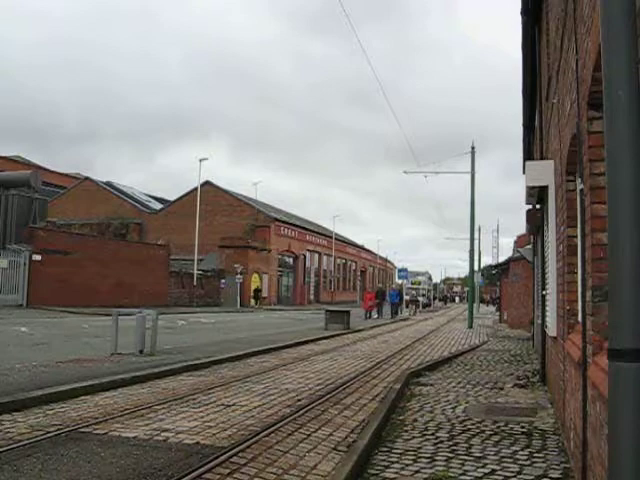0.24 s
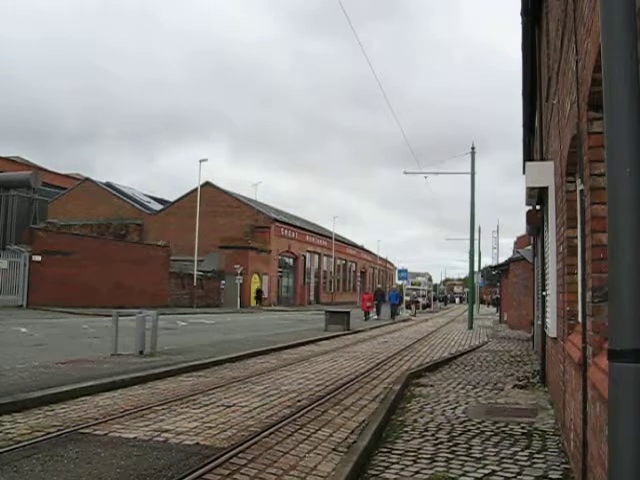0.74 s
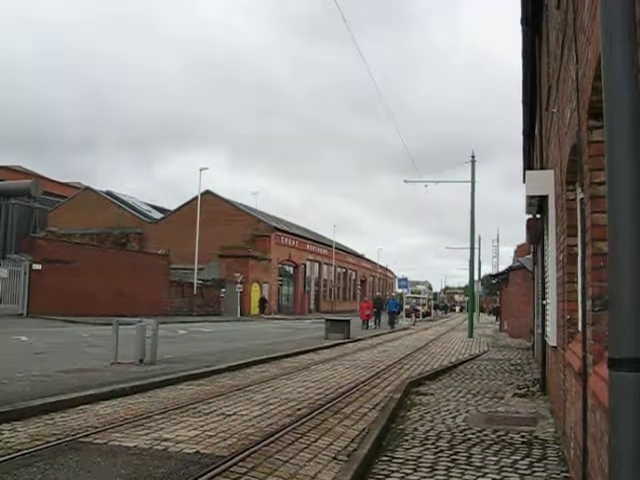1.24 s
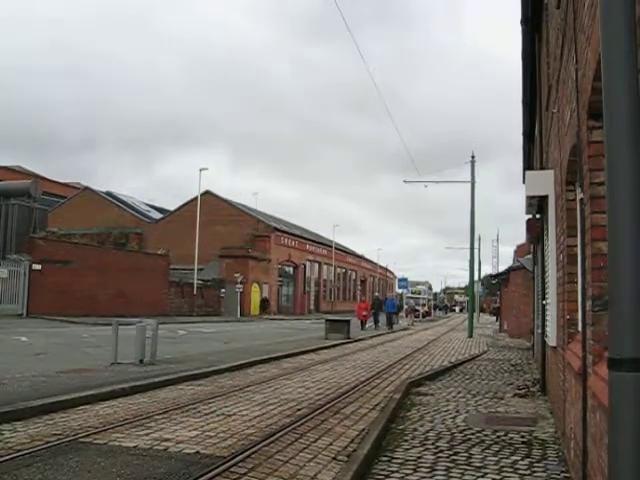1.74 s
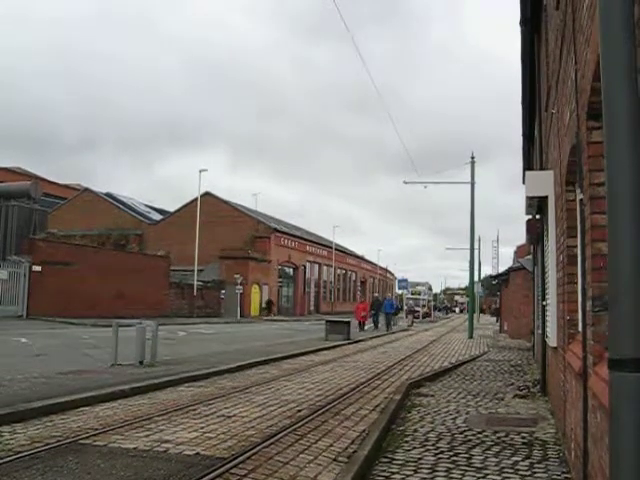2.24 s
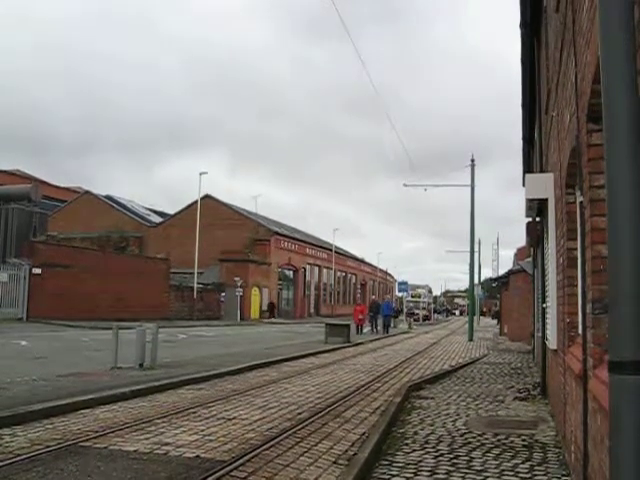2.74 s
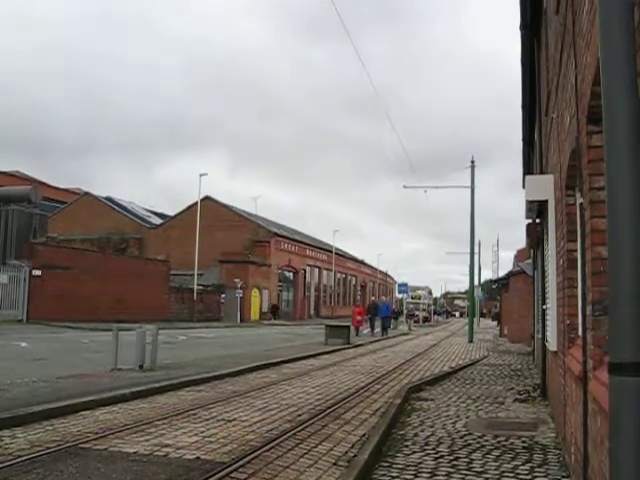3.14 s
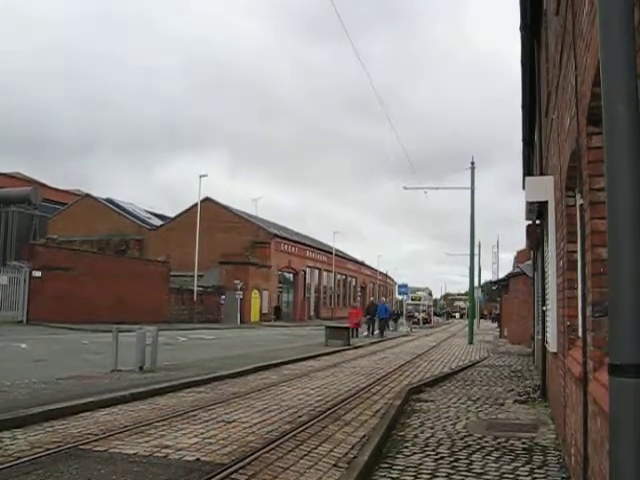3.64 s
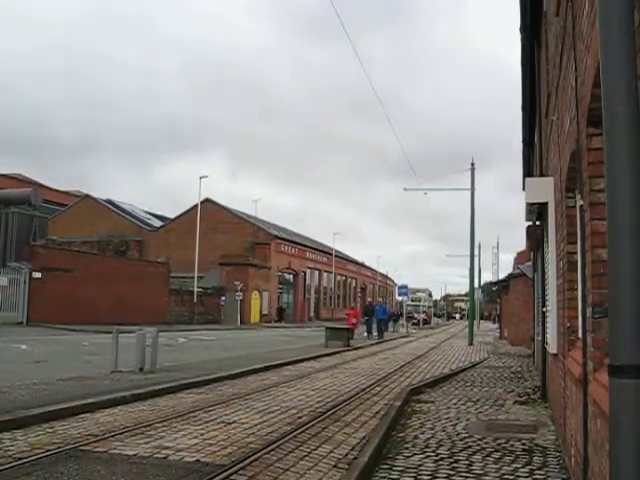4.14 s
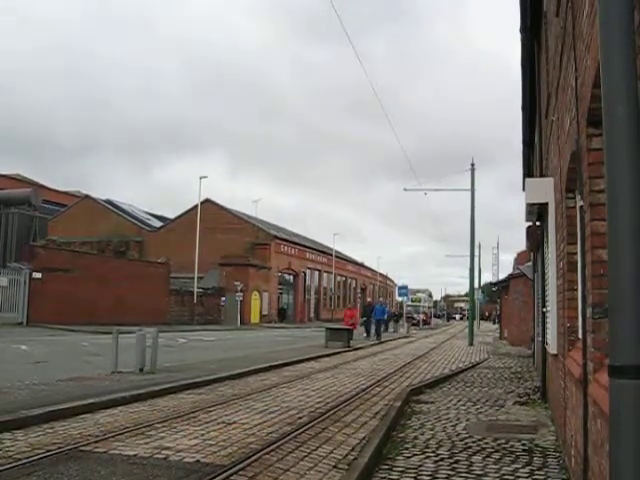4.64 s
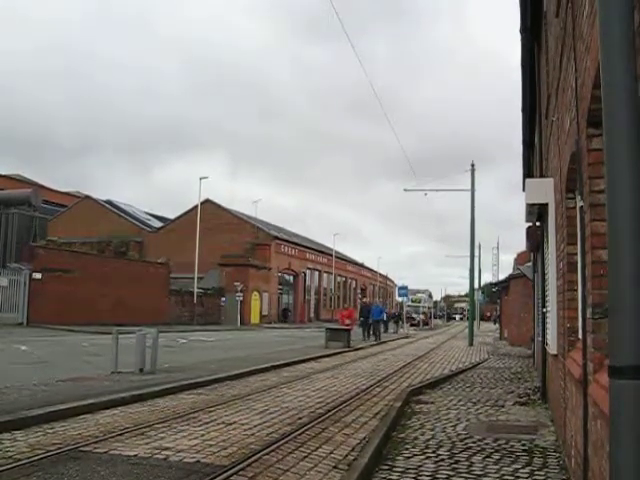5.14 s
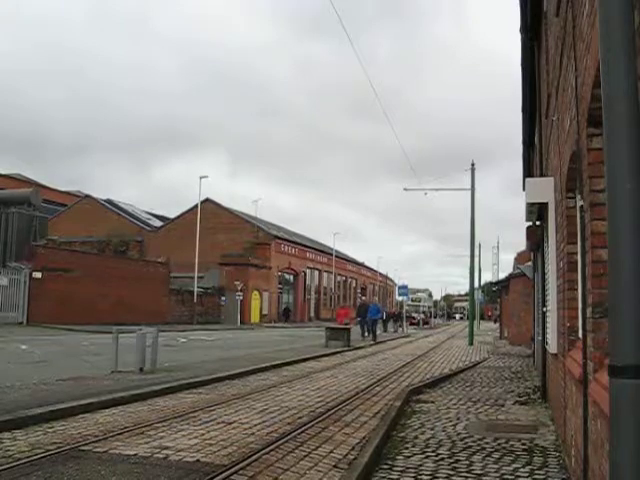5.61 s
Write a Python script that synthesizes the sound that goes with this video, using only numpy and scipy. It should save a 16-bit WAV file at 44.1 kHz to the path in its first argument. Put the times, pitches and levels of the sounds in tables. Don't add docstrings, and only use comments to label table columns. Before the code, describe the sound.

A deep mains-type hum with fainter higher overtones drones beneath dull distant traffic. Close wind bursts thump, flutter and spit against the microphone, each making the background dip and creep back. A ringing tap comes at about one second, more knocks and light scrapes after four. The later part is calmer and hummier, with a small click and faint thin tones at the end. Narrow, muffled, mono sound.

```python
import sys
import numpy as np
from scipy import signal
from scipy.fft import rfft, irfft, next_fast_len
from scipy.io import wavfile
from scipy.ndimage import uniform_filter1d, map_coordinates

SR = 44100
rng = np.random.default_rng(int(sys.argv[2]) if len(sys.argv) > 2 else 0)


def master_out(mix):
    frames = np.transpose(np.atleast_2d(mix))
    ceiling = np.clip(frames, -1, 1)
    pcm = np.round(ceiling * 32767).astype(np.int16)
    wavfile.write(sys.argv[1], SR, pcm)


def linear_from_db(decibels):
    return 10 ** (np.asarray(decibels, float) / 20)


N = 258867
TIME = np.arange(N) / SR
SKIP_S, LOST_S = 5.39613, 0.00213


def unit(x):
    return x / np.sqrt(np.mean(x ** 2) + 1e-20)


def along(points, hz):
    f, v = np.transpose(points)
    return np.interp(np.log(hz + 1), np.log(f + 1), v, left=-120, right=-120)


def shaped(x, spectrum):
    gain_db = along(spectrum, np.fft.rfftfreq(len(x), 1 / SR))
    return irfft(rfft(x) * linear_from_db(gain_db), len(x))


def wobble(knots_per_s):
    knots = rng.standard_normal(int(N * knots_per_s / SR) + 4)
    return map_coordinates(knots, [TIME * knots_per_s])


def noise(spectrum):
    white = rng.standard_normal(next_fast_len(N + 8192))
    return unit(shaped(white, spectrum)[:N])


def coloured(burst, spectrum):
    x = shaped(burst, spectrum)
    return x / np.linalg.norm(x)


def buffeting():
    # peak_s, length_s, strength_db, eddy_size_db (plus = large and low)
    gusts = [(0.183, 0.077, -25.5, -2.5), (0.303, 0.15, -29, 1), (0.445, 0.035, -35, 8),
             (0.766, 0.17, -27.5, 3), (0.946, 0.3, -30, 0.5), (1.062, 0.073, -22.5, 1.5),
             (1.141, 0.034, -26.5, 4), (1.25, 0.1, -24.5, 0.5), (1.42, 0.21, -28.5, 0.5),
             (1.621, 0.028, -24, -1.5), (1.737, 0.076, -24.5, 2), (1.933, 0.18, -32, -4),
             (2.035, 0.078, -25, 4), (2.26, 0.19, -35.5, -6.5), (2.49, 0.13, -29, 2),
             (2.742, 0.035, -24.5, 0.5), (2.965, 0.037, -30, -1), (3.103, 0.08, -32.5, 5.5),
             (3.301, 0.14, -29, 1), (3.493, 0.076, -21, -2), (3.624, 0.12, -25.5, -2.5),
             (3.733, 0.093, -26.5, -2), (3.84, 0.055, -31, 1), (4.022, 0.038, -44, 15),
             (4.187, 0.12, -24.5, 2), (4.398, 0.17, -25, -1.5), (4.631, 0.31, -26.5, -0.5),
             (5.12, 0.13, -24.5, 3.5), (5.43, 0.28, -31.5, -2), (5.636, 0.37, -34, 2)]
    # freq_hz, level_db_per_hz
    rumble = [(15, -30.5), (30, -8.5), (60, -6), (90, -4.5), (130, -25)]
    # freq_hz, level_db_per_hz
    flutter = [(70, -34), (100, -2.5), (170, -3), (230, -10.5), (300, -37)]
    # freq_hz, level_db_per_hz
    body = [(170, -31.5), (240, -2.5), (450, -7.5), (800, -18.5), (1300, -25.5), (2500, -43), (5000, -61)]
    breeze_db, body_calm_db = -36, -35
    mid_gust_db, body_db, body_follows = -28, -29, 0.38
    still_s, still_db = 0.13, -15
    fall_ratio = 0.77

    lumps = wobble(28)
    coarse_s = TIME[::64]
    peak_s, length_s, db, size_db = np.transpose(gusts)
    since_s = coarse_s[:, None] - peak_s
    width_s = length_s * np.where(since_s > 0, fall_ratio, 1)
    swell = np.exp(-(2 * since_s / width_s) ** 2)
    calming_db = still_db * np.clip(1 - coarse_s / still_s, 0, 1) ** .5

    def layer(colour, peak_db, calm_db, trim_db, lumpy_db):
        power = swell @ linear_from_db(2 * peak_db) + linear_from_db(2 * (calm_db + calming_db))
        gain = np.repeat(np.sqrt(power), 64)[:N]
        return gain * linear_from_db(trim_db) * unit(linear_from_db(lumpy_db * lumps) * noise(colour))

    small_db = body_db + body_follows * (db - mid_gust_db)
    return (layer(rumble, db + size_db, breeze_db, .3, 1.5)
            + layer(flutter, db - size_db, breeze_db, .3, 3)
            + layer(body, small_db, body_calm_db, -2.5, 3.5))


def eddies():
    # time_s, level_db, bite_db, length_ms
    strong = [(.1684, -17.5, -48, 1.64), (.187, -22, -40, 1.6), (.2084, -22, -38, 4),
              (.2158, -24.5, -41, 3.9), (.2228, -27.5, -15, 3.9), (.2248, -21, -36, 5.3),
              (.3393, -22, -51, 4.3), (.3688, -24, -32, 3.8), (.3829, -25, -23, 2.5),
              (.8393, -27.5, 5, 1.2), (.8752, -28.5, 1, 3.5), (.8822, -29.5, -10, 6.7),
              (1.1407, -31, -17, 25), (1.1593, -29.5, 2, 3.6), (1.2415, -27, -22, 5.4),
              (1.2579, -21.5, -30, 5.8), (1.2719, -21, -18, 5.6), (1.288, -27, -14, 6.3),
              (1.297, -29.5, -14, 9.8), (1.3808, -24, -17, 7.4), (1.6157, -27, -20, 5),
              (1.7912, -27, -5, 3.4), (2.035, -23, -17, 5.6), (2.039, -26, -22, 3.4),
              (2.0569, -21, -25, 4.2), (2.1832, -27.5, -12, 5.6), (2.2149, -27, -19, 9.5),
              (2.2639, -23.5, -16, 2.6), (2.2699, -24, -9, 4.5), (2.4706, -26.5, -29, 2.9)]
    # time_s, level_db, bite_db
    lesser = [(.1528, -33, -11), (0.2014, -29.5, -29), (0.3293, -38, -29), (0.4182, -29.5, -28),
              (.4448, -32.5, -29), (.6194, -42.5, -19), (.7893, -34, -15), (1.0998, -32, -13),
              (1.2319, -30, -9), (1.281, -29, -11), (1.3575, -32.5, -7), (1.3931, -27.5, -19),
              (1.448, -36.5, -5), (1.4841, -34, -25), (1.5527, -38, -11), (1.7673, -31, -19),
              (1.779, -28.5, -15), (1.7981, -30.5, -14), (1.963, -33.5, -8), (2.064, -24.5, -31),
              (2.0928, -32.5, -14), (2.1166, -31, -17), (2.1768, -26, -29), (2.2432, -33, -13),
              (2.2926, -36, -16), (2.5095, -31, -26), (3.3036, -38, -24), (3.5098, -32, -23),
              (5.1598, -39, -20), (5.4502, -33, -33)]
    # first_s, eddy_count, level_db
    flurries = [(0.179, 2, -32), (0.2983, 1, -32.5), (0.348, 2, -44), (.395, 2, -42), (0.6818, 4, -46),
                (.858, 1, -35), (1.0887, 1, -38), (1.2099, 2, -37), (1.3085, 4, -36), (1.4251, 3, -34),
                (1.5219, 1, -42), (1.595, 1, -37), (1.6306, 2, -32), (1.7231, 4, -34.5), (1.808, 1, -35),
                (1.8509, 3, -36), (1.9308, 6, -39.5), (2.1216, 4, -38.5), (2.2225, 1, -34), (2.3, 2, -32),
                (2.4424, 8, -39), (2.9943, 1, -44), (3.495, 1, -40.5), (3.6087, 1, -45), (3.71, 1, -46),
                (3.8108, 2, -44.5), (4.573, 1, -40), (4.6434, 1, -39), (5.4958, 1, -39), (5.5304, 1, -35)]
    spit_ms, gap_s, faint_bite_db, scatter_db = 3.6, 0.012, -22, 2

    faint = []
    for first_s, count, db in flurries:
        for k in range(round(count)):
            s = first_s + gap_s * (k + (k > 0) * rng.uniform(-.4, .4))
            level_db = db + scatter_db * rng.normal()
            bite_db = faint_bite_db + 4 * rng.normal()
            faint.append((s, level_db, bite_db, spit_ms * np.exp(.4 * rng.normal())))
    return strong + [(*spit, spit_ms) for spit in lesser] + faint


def pops():
    mid_db, thump_follows, thump_scatter_db = -26.5, 0.48, 2
    thump_band = [(60, -24.0), (200, 6.5), (500, -1.5), (850, -7.5), (1300, -43.0)]
    out, t = np.zeros(N + 2048), (np.arange(2048) - 1024) / SR
    for s, db, bite_db, ms in eddies():
        u = t / (max(ms, 1.5) / 2300 - .0004)
        envelope = np.exp(-.5 * (u * np.where(u < 0, 1.3, .8)) ** 2)
        burst = envelope * rng.standard_normal(len(t))
        edge_band = [(650, -21.0), (1050, 1.5), (1800, .5 * bite_db + 9.0),
                     (3300, bite_db - 2.0), (5600, bite_db - 27.5)]
        edge = linear_from_db(db - 3.0) * coloured(burst, edge_band)
        thump_db = mid_db + thump_follows * (db - mid_db) + thump_scatter_db * rng.normal()
        thump = linear_from_db(thump_db + 6.0) * coloured(burst, thump_band)
        out[round(s * SR) - 1024:][:len(t)] += np.sqrt(ms * SR / 1000) * (edge + thump)
    return out[:N]


def ticks():
    # time_s, peak_db, ring_hz, decay_s (a longer one rings longer), crack_db
    taps = [
        (0.977, -15.5, 1277, 0.06, -23),
        (0.9792, -10.5, 3130, 0.012, -41),
        (.994, -25, 890, 0.0036, -24.5),
        (3.9406, -6, 1540, 0.025, -37),
        (4.68, -18, 1240, 0.037, -67),
        (4.695, -8.5, 1050, 0.016, -43),
        (4.7998, -11, 1310, 0.021, -39),
        (4.82, -12.5, 1180, 0.013, -42),
        (5.214, -23, 2040, 0.015, -51),
        (5.367, -25, 1740, 0.024, -40),
    ]
    modes = (.7, .55), (1, 1), (1.35, .25)
    out, t = np.zeros(N + SR), np.clip(np.arange(-256, 3840) / SR, 0, None)
    for s, db, hz, decay_s, crack_db in taps:
        ring = sum(gain * np.sin(2 * np.pi * ratio * hz * t) for ratio, gain in modes)
        ring = linear_from_db(db - 186 * (t / decay_s) ** 1.32) * ring * (1 - np.exp(-t / 0.0011))
        fade = (t > 0) * linear_from_db(-60 * t / (2.8 * decay_s))
        band = [(.3 * hz, -16), (.7 * hz, 0), (1.5 * hz, -3), (3.2 * hz, -26)]
        crack = coloured(fade * rng.standard_normal(len(t)), band)
        out[round(s * SR) - 256:][:len(t)] += ring + linear_from_db(crack_db + 20.0) * crack
    return out[:N]


def scrapes():
    # time_s, length_ms, level_db, centre_hz
    slips = [(0.9766, 4.9, -33, 4570), (1.027, 2.8, -35.5, 4000), (1.918, 8.2, -45.5, 3770),
             (2.612, 5.1, -50, 4200), (2.946, 8.6, -49, 3300), (4.789, 16, -51.5, 3500),
             (4.921, 15, -49, 4220), (5.047, 11, -36, 4220), (5.062, 7.5, -44, 4200),
             (5.077, 6.3, -49.5, 4600), (5.087, 15, -48.5, 4200)]
    out, t = np.zeros(N + 2048), np.arange(-256, 1792) / SR
    for s, ms, db, hz in slips:
        burst = (t > 0) * np.exp(-abs(t * 1000 / ms) ** 3) * rng.standard_normal(len(t))
        band = [(.4 * hz, -26), (.78 * hz, -4), (hz, 0), (1.25 * hz, -4), (1.7 * hz, -16)]
        out[round(s * SR) - 256:][:len(t)] += linear_from_db(db) * np.sqrt(ms * SR / 1000) * coloured(burst, band)
    return out[:N]


def transformer():
    # multiple, level_db, drift_db_per_s
    partials = [(1, -15, 0), (2, 0, 0), (3, -21, 0), (4, -24, .5), (5, -14, 1), (6, -16.5, 0),
                (7, -27.5, .4), (8, -27, -2.2), (9, -26, -.4), (10, -30.5, .7)]
    core_hz = 99.92
    turns = core_hz * (TIME - LOST_S * np.clip((TIME - SKIP_S) / .003, 0, 1))
    hum = np.zeros(N)
    for k, db, drift_db in partials:
        waver_db = (k != 2) * k / 12 * (wobble(1.5) + wobble(7))
        level_db = db + drift_db * (TIME - 3.5) + waver_db
        lag = 1.68 * k * k
        hum += np.sqrt(2) * linear_from_db(level_db) * np.cos(2 * np.pi * k * turns + lag)
    return hum


def street():
    # freq_hz, level_db_per_hz
    traffic = [(150, -25), (250, -3.5), (500, -5.5), (800, -3), (1080, -10.5), (1250, -20), (1600, -16.5),
               (2000, -24.5), (2600, -27), (3500, -28.5), (5200, -35.5), (6280, -38.5)]
    # start_s, end_s, pitch_hz, level_db
    squeaks = [
        (5.68, 5.87, 624.5, -12),
        (5.69, 5.795, 2519, -30),
        (5.81, 5.855, 2519, -29),
        (2.6, 4.4, 3462, -43),
        (4.75, 5.3, 3462, -42),
        (2.5, 5.9, 711, -25),
    ]
    nearing_s, nearing_db_per_s = 4.96, 1
    swell_db = .7 * wobble(2) + 1.2 * wobble(10)
    nearing_db = nearing_db_per_s * np.clip(TIME - nearing_s, 0, None)
    wash = linear_from_db(-12.5 + swell_db + nearing_db) * noise(traffic)
    for start, end, hz, db in squeaks:
        on = np.clip(np.minimum(TIME - start, end - TIME) / .012, 0, 1)
        level = on * linear_from_db(db + wobble(9))
        wash += level * np.sin(2 * np.pi * hz * TIME + 500 / hz * wobble(30))
    return wash


def gain_control():
    # time_s, depth_db
    blows = [(.04, 9), (0.219, 21), (.33, 18.5), (.79, 23), (.94, 12.5), (.99, 17.5), (1.14, 18),
             (1.25, 17.5), (1.34, 19), (1.42, 23.5), (1.62, 17), (1.69, 18), (1.79, 13.5), (1.87, 11.5),
             (1.98, 10.5), (2.04, 22), (2.2, 7), (2.31, 11.5), (2.52, 8.5), (3.409, 3), (3.5, 16),
             (3.56, 10.5), (3.941, 6.5), (4.17, 5.5), (4.41, 6), (4.57, 10), (4.67, 5.5), (4.81, 5.5),
             (5.158, 6), (5.42, 2.5)]
    open_db, hold_s, release_s = -20, 0.017, 0.18
    ducks_db = []
    for s, depth_db in blows:
        since_s = TIME - s
        release = np.exp(-np.clip(since_s - hold_s, 0, None) / release_s)
        ducks_db.append(depth_db * (since_s > 0) * release)
    return linear_from_db(uniform_filter1d(open_db - np.max(ducks_db, axis=0), size=600))


def scene():
    near = buffeting() + pops() + ticks() + scrapes()
    far = transformer() + street()
    return (near + gain_control() * far)[None]


def low_pass(x):
    return signal.sosfilt(signal.butter(12, 15750, fs=SR, output="sos"), x)


def record(dry):
    # freq_hz, level_db_per_hz
    self_noise = [(300, -23.5), (1000, 5), (3000, -4.5), (5300, -2), (6280, -10.5)]
    start_s = 0.04542
    x = dry + linear_from_db(-53.0) * noise(self_noise)
    x = x / (1 + abs(x / .41) ** 3) ** (1 / 3)
    x = signal.sosfiltfilt(signal.butter(9, 5450, fs=SR, output="sos"), x)
    since_s = TIME - SKIP_S
    x = x + .125 * np.sign(since_s) * np.exp(-abs(since_s) / .0018)
    opened_s = np.clip(TIME - start_s, 0, None)
    chirp = 0.044 * np.cos(2 * np.pi * 3700 * opened_s) * np.exp(-opened_s / 0.00095)
    x = (x - .002 + chirp) * (TIME >= start_s)
    x = x * np.clip((N / SR - TIME) / .004, 0, 1)
    return low_pass(x)


dry = scene()
out = record(dry)
master_out(out)
```